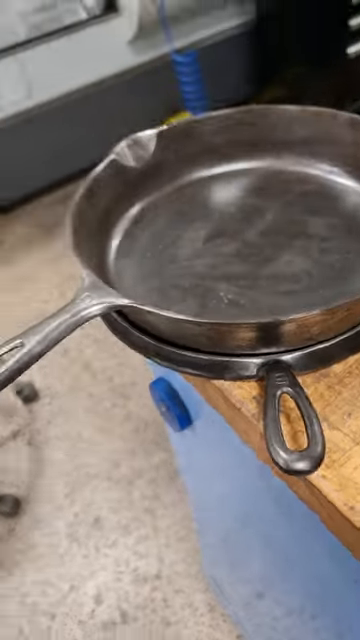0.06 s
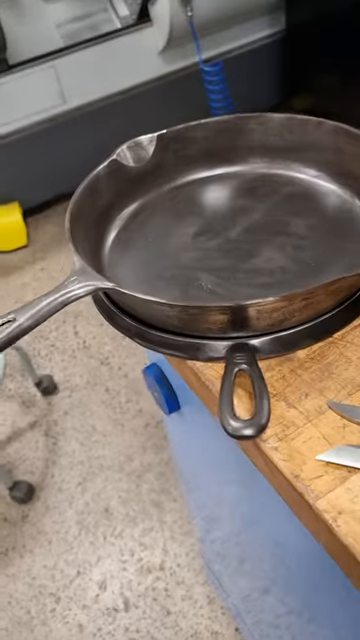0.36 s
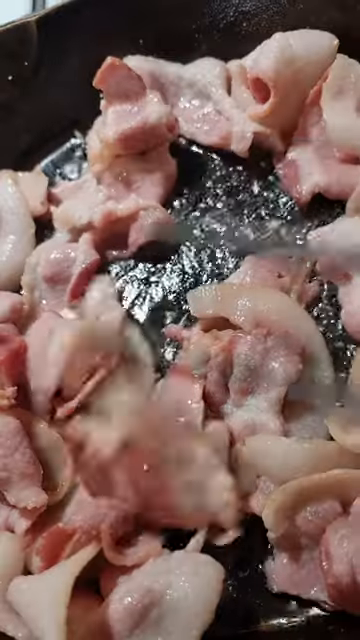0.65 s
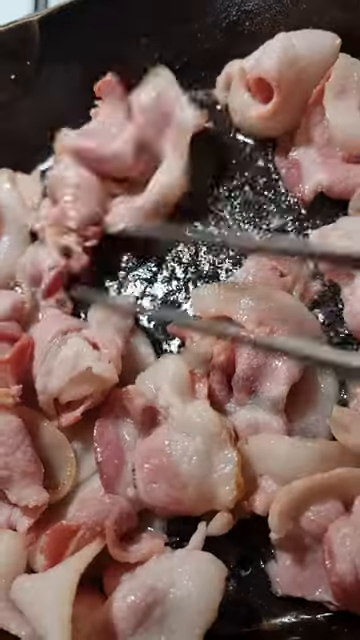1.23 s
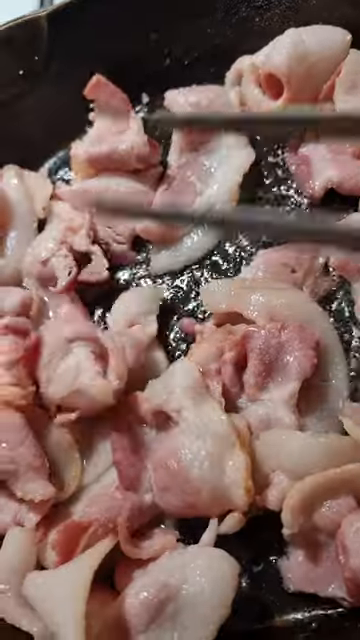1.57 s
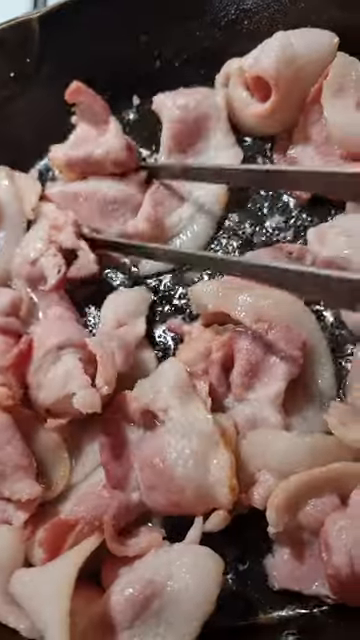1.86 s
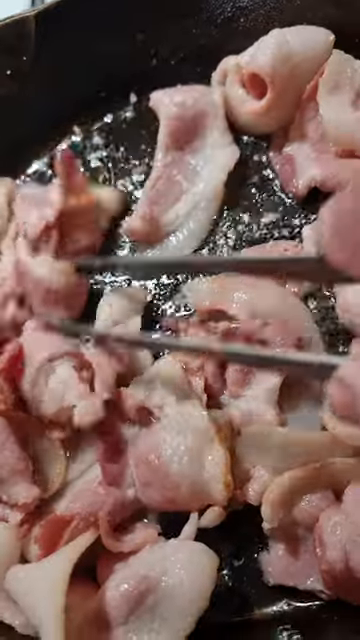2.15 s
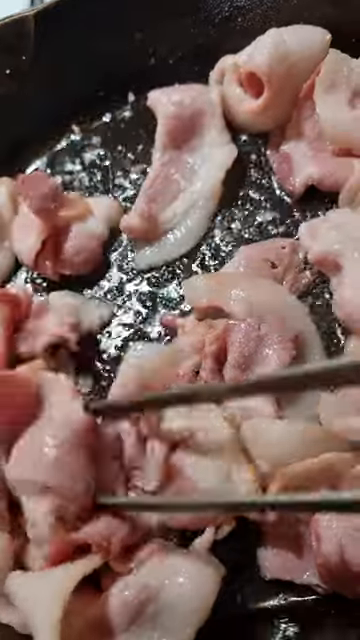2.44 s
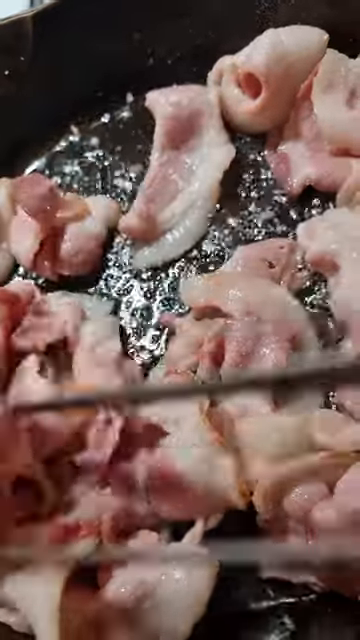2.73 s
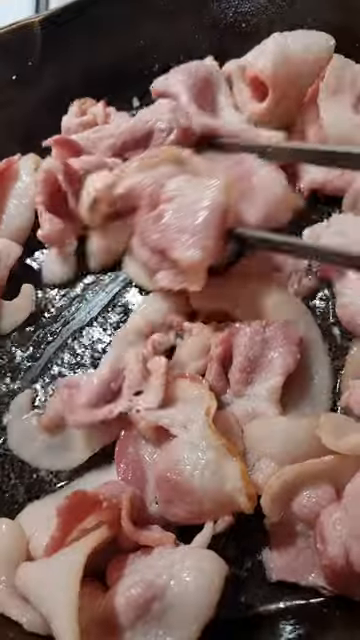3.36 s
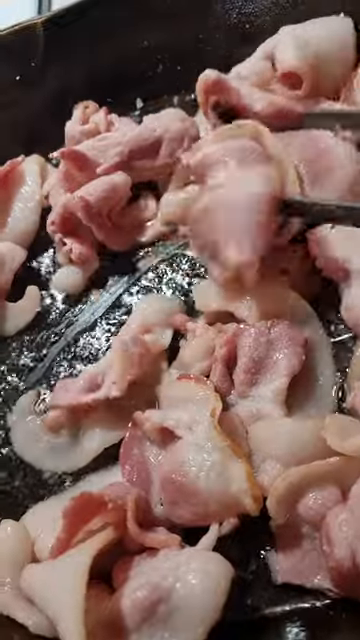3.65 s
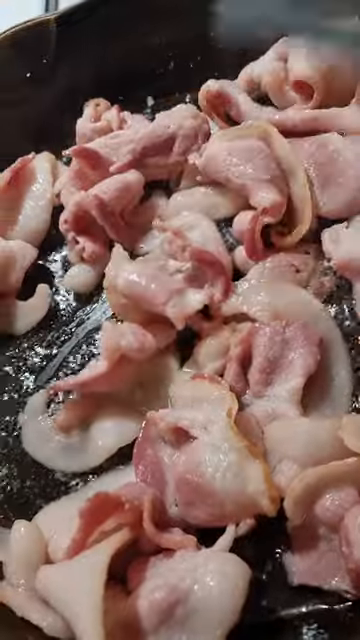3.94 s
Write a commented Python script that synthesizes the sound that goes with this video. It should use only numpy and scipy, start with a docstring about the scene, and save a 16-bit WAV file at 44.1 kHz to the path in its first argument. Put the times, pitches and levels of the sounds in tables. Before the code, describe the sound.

Bacon sizzles and crackles in a pan while tongs turn it.

```python
"""Bacon frying in an iron pan, close to a two-port microphone, with the kitchen rumbling underneath.
Countless steam bubbles burst in the fat: big ones burble and sputter, small ones crackle and fizz,
a few pop loudly. The tongs knock and drag on the pan, the bubbling flares up briefly, and a lump
squelches as it is turned. Ahead of the cut to the kitchen comes half a second of quiet workshop:
room tone, mains hum and a faint swish."""
import sys
import numpy as np
from scipy import signal
from scipy.fft import rfft, irfft, next_fast_len
from scipy.io import wavfile
from scipy.ndimage import map_coordinates

SR = 44100
rng = np.random.default_rng(int(sys.argv[2]) if len(sys.argv) > 2 else 0)


def store_pcm(level_fs):
    """Save levels as 16-bit WAV."""
    pcm = np.round(np.clip(level_fs, -1, 1) * 32767).astype(np.int16)
    wavfile.write(sys.argv[1], SR, np.atleast_2d(pcm).T)


N = 176400
LEAD_S = 0.0002205  # the pan is off to the left, so the left port hears it first

# Workshop ambience, likeness at the two ports: f/Hz, correlation
WORKSHOP_ALIKE = [(100, 0.89), (400, 0.0082), (900, -0.53), (4000, -0.0082)]


def amp(db):
    """Decibels to gain."""
    return 10 ** (np.asarray(db) / 20)


def along(points, hz):
    """Read (f/Hz, value) points on a log axis."""
    f, v = np.transpose(points)
    return np.interp(np.log(hz + 1), np.log(f + 1), v)


def curve(rows):
    """Read (t/s, value) points at every sample."""
    return np.interp(np.arange(N) / SR, *np.transpose(rows))


def band(hz, low_hz, high_hz):
    """Gain of a band with steep skirts."""
    return 1 / np.sqrt((1 + (hz / high_hz) ** 10) * (1 + (low_hz / (hz + 1)) ** 10))


def low_cut(x, hz, order):
    """Roll off the bass below hz."""
    return signal.sosfilt(signal.butter(order, hz, "high", fs=SR, output="sos"), x)


def filtered(x, response):
    """Apply a gain that depends on frequency."""
    m = next_fast_len(N + SR // 2)
    return irfft(rfft(x, m) * response(np.fft.rfftfreq(m, 1 / SR)), m)[..., :N]


def unit(pair):
    """Scale a stereo pair so that its mid signal has rms 1."""
    return pair / np.sqrt(np.mean(pair.mean(0) ** 2) + 1e-20)


def room_tone(spectrum, alike):
    """Steady noise with a given colour and likeness between the ports."""
    def mid_side_gains(hz):
        angle = np.arccos(np.clip(along(alike, hz), -.99, .99)) / 2
        return amp(along(spectrum, hz)) * [np.cos(angle), np.sin(angle)]
    mid, side = filtered(rng.standard_normal((2, N)), mid_side_gains)
    return unit(np.array([mid + side, mid - side]))


def workshop_air():
    """The workshop's room tone, with one faint swish at the start."""
    # Colours of the still air and of the swish: f/Hz, relative level/dB
    air_colour = [(25, -35), (50, -13), (115, -12), (260, -7.5), (420, -8.5), (1150, -9.5), (1500, -18.5),
                  (3400, -15.5), (5000, -23), (7000, -24.5), (8200, -32), (10500, -29), (12500, -20.5),
                  (15500, -22)]
    swish_colour = [(900, -9), (2000, -10), (3450, -7), (4100, -7), (4600, -14), (7000, -18.5), (9000, -28)]
    # Rise and fall of the swish: t/s, level/dB
    swish_level = [(0, -68), (.08, -62), (.2, -67), (.4, -88)]
    air = amp(-64) * room_tone(air_colour, WORKSHOP_ALIKE)
    return air + amp(curve(swish_level)) * room_tone(swish_colour, WORKSHOP_ALIKE)


def mains_hum(waver_hz=4.9):
    """Mains hum, dead centre, each partial wavering slightly in phase."""
    # Hum partials: f/Hz, relative level/dB
    partials = [(118.4, -70.5), (236.9, -76), (360.7, -72.5)]
    out, t = np.zeros(N), np.arange(N) / SR
    for hz, db in partials:
        waver = map_coordinates(rng.standard_normal(N // 20), [t * waver_hz], mode="wrap")
        out += np.sqrt(2) * amp(db - 2.5) * np.sin(2 * np.pi * hz * t + .3 * waver)
    return out


def kitchen_rumble():
    """The kitchen's steady low rumble, nearly the same at both ports."""
    # Colour of the rumble: f/Hz, relative level/dB
    colour = [(22, -21), (35, -7.5), (50, -2), (70, -3), (100, -11), (125, -2), (150, -6.5), (190, -16.5),
              (260, -9.5), (400, -16), (900, -21)]
    # Its likeness at the two ports: f/Hz, correlation
    alike = [(130, .97), (300, 0.91), (600, 0.3)]
    return amp(-48) * room_tone(colour, alike)


def echo(x, t60, count):
    """A dying diffuse tail, drawn anew for each of count stretches of time."""
    t = np.arange(SR // 4) / SR
    t = t[t < t60]
    out = np.zeros((2, N + len(t)))
    for part in np.array_split(np.arange(N), count):
        noise = rng.standard_normal((2, SR // 4))[:, :len(t)]
        tail = noise * amp(-60 * t / t60) * (1 - np.exp(-40 * t / t60))
        tail /= np.linalg.norm(tail, axis=1, keepdims=True)
        wet = signal.fftconvolve(x[:, part], tail, axes=1)
        out[:, part[0]:part[0] + wet.shape[1]] += wet
    return out[:, :N]


def ports(hz):
    """Gain and phase with which each port of the microphone hears the pan."""
    # Port balance: f/Hz, left minus right level/dB
    balance = [(100, 0), (380, -8), (700, 4.5), (1300, 1), (1700, -1), (2250, -5), (3100, 1.5), (4700, -3),
               (5600, 0), (6500, 0), (7300, 11), (9000, 6.5), (10500, 4.5), (12400, 2), (13600, 3.5),
               (15500, 7.5)]
    # Extra lead at the left port, from sound bending round the microphone: f/Hz, phase/rad
    bend = [(150, 0.02), (380, 0.65), (650, 1.33), (1030, 0.29), (1380, 0.53), (1900, -0.85), (3000, 0.26),
            (3700, 0.04), (4400, -0.022), (6400, 0.58), (9000, -0.4)]
    half = np.array([[.5], [-.5]])
    return amp(half * along(balance, hz)) * np.exp(1j * half * along(bend, hz))


def tong_knocks(left_db=9):
    """The tongs hit the pan through the bacon: a quickly damped ring, nearer the left port."""
    # Knocks: t/s, relative level/dB
    hits = [(0.9866, -32.5), (1.9859, -31)]
    # Modes of the loaded pan: f/Hz, relative level/dB, t60/s
    modes = [(476, -3.5, 0.11), (593, 3, 0.049), (760, -11, 0.013), (1550, -3, .01)]
    out = np.zeros((2, N))
    for s, db in hits:
        t = np.maximum(np.arange(N) / SR - s - np.array([[0], [LEAD_S]]), 0)
        for hz, mode_db, t60 in modes:
            out += amp(db + mode_db - 60 * t / t60) * np.sin(2 * np.pi * hz * t)
    return low_cut(out, hz=382, order=4) * amp(left_db * np.array([[.5], [-.5]]))


def bursts(rows, gain_db, rise_s=0.00018, delay_s=0.00077):
    """Single bubbles burst: a ring, longer the bigger and lower the bubble, with a snap of noise."""
    out, t = np.zeros((2, N + SR)), np.arange(SR // 50) / SR
    f = np.fft.rfftfreq(len(t), 1 / SR)
    for s, db, hz, lead in rows:
        t60 = .0018 + 8 / hz
        shape = (1 - np.exp(-(t / rise_s) ** 2)) * amp(-60 * t / t60)
        snap = irfft(rfft(rng.standard_normal(len(t))) * band(f, hz / 2, 2 * hz), len(t))
        ring = np.sin(2 * np.pi * hz * t) + .16 * snap / snap.std()
        burst = low_cut(amp(db + gain_db) * shape / shape.max() * ring, hz / 2, order=3)
        for port, lag in enumerate((0, lead)):
            arrival = irfft(rfft(burst) * np.exp(-2j * np.pi * f * lag), len(t))
            out[port, round((s + delay_s) * SR):][:len(t)] += arrival
    return out[:, :N]


def spits():
    """The fat spits with a thin, high snap."""
    # Spits: t/s, relative level/dB, f/Hz
    snaps = [(1.267, -7, 15500), (1.6023, -16, 12060), (1.756, -16, 15600), (1.771, -18.5, 13700),
             (2.4259, -24, 12800), (2.8915, -19.5, 14440), (3.882, -20, 15200)]
    return bursts([(*row, LEAD_S) for row in snaps], gain_db=5)


def pops():
    """Big bubbles burst loudly, each at its own spot in the pan."""
    # Pops: t/s, relative level/dB, f/Hz, lead at the left port/s
    big_bubbles = [(.6678, -14, 5050, .00022), (.6863, -14.5, 2130, 0.000114),
                   (.8881, -19.5, 5370, 0.000187), (.927, -18, 4330, 0.00021),
                   (1.1375, -20, 2120, 0.000089), (1.1752, -18, 4400, 0.00017),
                   (1.2397, -16, 4980, 0.000237), (1.3397, -20, 3270, 0.00033), (1.995, -23, 2250, 0.00012),
                   (2.4255, -19.5, 4500, 0.000237), (2.4437, -15, 2370, 0.00014),
                   (2.5305, -12.5, 2730, 0.00013), (2.6717, -14, 4900, 0.00026),
                   (2.8998, -16.5, 4250, 0.00023), (3.1075, -6.5, 5100, 0.000237),
                   (3.3503, -15, 2590, 0.00037), (3.48, -13.5, 5800, 0.00019), (3.557, -14, 2540, 0.00019),
                   (3.6403, -12, 2580, 0.00026), (3.8101, -15, 5040, .00022), (3.9528, -18, 4230, 0.00032)]
    return bursts(big_bubbles, gain_db=3.5)


def rings(start, hz, t60, spread_db, lead_spread_s=.00013):
    """One tiny damped ring per start (in samples), a few much stronger, each from its own spot."""
    strength, place = rng.random((len(start), 2)).T[:, :, None]
    k = np.arange(int(t60 * SR) + 24)
    samples = start.astype(int)[:, None] + k
    size = amp(-spread_db * np.log(np.maximum(strength, .01)))
    pair = []
    for delay in (0, LEAD_S + lead_spread_s * (2 * place - 1)):
        t = np.maximum(k / SR - delay, 0)
        ring = size * np.sin(2 * np.pi * hz[:, None] * t) * amp(-60 * t / t60)
        pair.append(np.bincount(samples.ravel(), ring.ravel(), N + SR)[:N])
    return np.array(pair)


def squelch(bubbles_per_s=3000, spread_octaves=0.0815):
    """A lump of bacon is pressed and turned: the bubbles climb in pitch as they get smaller."""
    # Course of the squelch: t/s, f/Hz, level/dB
    course = [(3.11, 2000, -33), (3.14, 1948, -32), (3.25, 2070, -35.5), (3.33, 2450, -32),
              (3.4, 2650, -31), (3.47, 2680, -45), (3.56, 2570, -33), (3.63, 2540, -30), (3.675, 2530, -52)]
    s, hz, db = np.transpose(course)
    span = s[-1] - s[0]
    when = s[0] + span * rng.random(int(bubbles_per_s * span))
    pitch = np.interp(when, s, hz) * 2 ** (spread_octaves * rng.standard_normal(len(when)))
    cloud = low_cut(rings(when * SR, pitch, t60=0.0071, spread_db=2.5), hz=1630, order=4)
    rms = np.sqrt(np.sum(cloud ** 2) / (2 * span * SR))
    return amp(curve(np.transpose([s, db]))) * cloud / rms


def swells(rings_per_s=4500, spread_octaves=.19, attack_s=0.00335, release_s=.018):
    """Short swells near one pitch: bubbling flare-ups, and a low tong drag after the first knock."""
    # Swells: t/s, length/s, level/dB, f/Hz
    events = [(0.649, 0.082, -38, 4900), (0.663, 0.079, -37.5, 2000), (0.999, .175, -42, 553),
              (1.029, 0.088, -32.5, 1710), (1.309, 0.035, -31.5, 3510), (1.387, 0.061, -31, 2270),
              (1.588, 0.039, -32.5, 4440), (2.016, 0.2, -39.5, 1960), (2.517, 0.012, -35, 2340),
              (3.153, 0.46, -47, 604)]
    out, t = np.zeros((2, N)), np.arange(N) / SR
    for s, length, db, hz in events:
        span = length + 2 * release_s
        when = s + span * rng.random(int(rings_per_s * span))
        pitch = hz * 2 ** (spread_octaves * rng.standard_normal(len(when)))
        cloud = low_cut(rings(when * SR, pitch, t60=10 / hz, spread_db=2.5), 0.81 * hz, order=3)
        rms = np.sqrt(np.sum(cloud ** 2) / (2 * span * SR))
        envelope = np.clip((t - s) / attack_s, 0, 1) * np.exp(-np.maximum(t - s - length, 0) / release_s)
        out += amp(db) * envelope * cloud / rms
    return out


def clusters(count, decay_s=0.0058):
    """Bubbles set each other off: surges of activity that start at once and die away, with mean 1."""
    when, size = rng.random((count, 2)).T
    strength = np.log(np.maximum(size, .07)) ** 2
    starts = np.bincount((when * N).astype(int), strength, N)
    surges = signal.lfilter([1], [1, -np.exp(-1 / (decay_s * SR))], starts)
    return surges / surges.mean()


def bubbles(shared, low_hz, high_hz, t60, spread_db, clustering, count, share=0.89):
    """Bubbles of one size class, surging mostly with the clusters that all sizes share."""
    # Colour of the frying: f/Hz, relative level/dB
    colour = [(180, -40), (300, -12), (425, -13), (591, -7.5), (745, -9.5), (864, -7.5), (1650, -5.5),
              (2110, -2), (4510, -4.5), (6600, -5.5), (8600, -19.5), (12200, -13.5), (15600, -15)]
    when, pitch = rng.random((count, 2)).T
    pair = rings(when * N, low_hz + (high_hz - low_hz) * pitch, t60, spread_db)
    surges = share * shared + (1 - share) * clusters(count=500)
    pair *= np.sqrt(1 + clustering * surges)
    return unit(filtered(pair, lambda hz: amp(along(colour, hz)) * band(hz, low_hz, high_hz)))


def sizzle():
    """Four bubble sizes boil at once where the bacon touches the iron."""
    # Activity of the big, the small and the finest bubbles: t/s, relative level/dB
    big = [(.6, -46), (.7, -49), (.92, -49.5), (1.05, -45.5), (1.25, -49), (1.42, -46), (1.54, -48.5),
           (1.9, -51.5), (2.0, -43.5), (2.3, -46), (2.52, -46), (2.7, -52), (2.85, -51), (3.0, -46.5),
           (3.33, -48), (3.63, -43.5), (3.7, -51), (3.96, -49)]
    small = [(.6, -40), (.68, -43.5), (.8, -45.5), (1.0, -41.5), (1.18, -40), (1.35, -40.5), (1.53, -43),
             (1.63, -41), (1.8, -42.5), (1.92, -42.5), (1.99, -38.5), (2.2, -40.5), (2.55, -41.5),
             (2.8, -44.5), (3.0, -41), (3.17, -37.5), (3.4, -40), (3.62, -39.5), (3.7, -42), (3.96, -42)]
    finest = [(.6, -46), (.73, -48), (1.1, -44.5), (1.35, -46), (1.48, -49), (1.6, -46.5), (1.67, -47.5),
              (1.77, -46.5), (1.9, -50), (2.08, -46), (2.42, -45), (2.8, -49.5), (3.18, -44), (3.6, -48.5),
              (3.96, -49.5)]
    shared = clusters(count=650)
    burble = bubbles(shared, 313, 934, t60=0.027, spread_db=2, clustering=0.09, count=4000)
    sputter = bubbles(shared, 887, 2956, t60=0.0031, spread_db=3, clustering=0.54, count=12000)
    crackle = bubbles(shared, 2635, 7230, t60=0.0028, spread_db=3, clustering=0.53, count=18000)
    fizz = bubbles(shared, 7220, 16300, t60=0.0021, spread_db=3.5, clustering=0.7, count=30000)
    return (burble * amp(curve(big) - 6) + sputter * amp(curve(big) + 6.5)
            + crackle * amp(curve(small) + 4.5) + fizz * amp(curve(finest) + 3.5))


def frying_pan():
    """The pan close up, with echoes off its wall and a duller, fainter return from the kitchen."""
    bed = sizzle() + swells() + squelch()
    accents = pops() + spits() + tong_knocks()
    wall = echo(bed + amp(-5) * accents, t60=0.018, count=60)
    pan = bed + accents + amp(-5.5) * wall
    room = filtered(echo(pan, t60=0.16, count=8), lambda hz: band(hz, low_hz=150, high_hz=11200))
    return filtered(pan + amp(-10) * room, ports)


def scene(workshop_end_s=.552, kitchen_start_s=.580, fade_s=0.00127):
    """The workshop, an instant of silence, then the kitchen."""
    t = np.arange(N) / SR
    workshop = mains_hum() + workshop_air()
    kitchen = frying_pan() + kitchen_rumble()
    fade_out = np.clip((workshop_end_s - t) / fade_s + 1, 0, 1)
    fade_in = np.clip((t - kitchen_start_s) / fade_s + .5, 0, 1)
    return workshop * fade_out + kitchen * fade_in


def record(dry, top_hz=15900):
    """The recorder keeps nothing above its band limit."""
    return filtered(dry, lambda hz: np.clip((top_hz - hz) / 200 + .5, 0, 1))


dry = scene()
out = record(dry)
store_pcm(out)
```